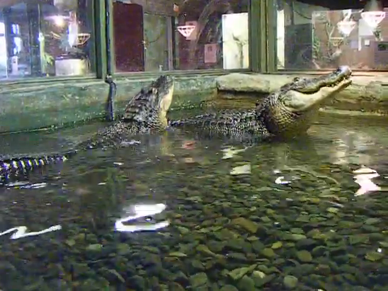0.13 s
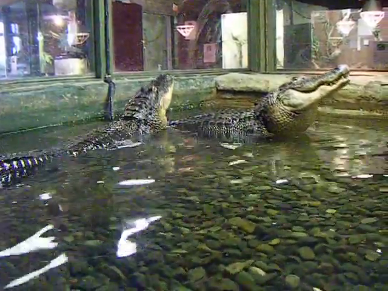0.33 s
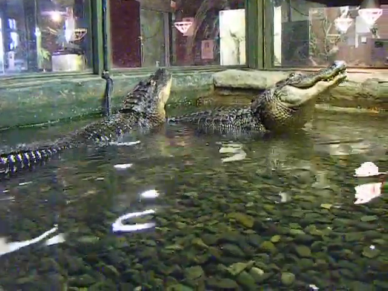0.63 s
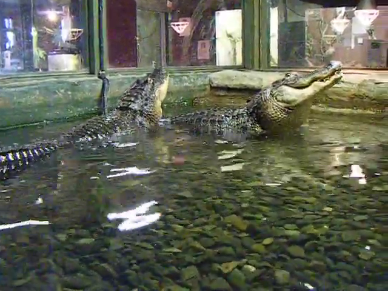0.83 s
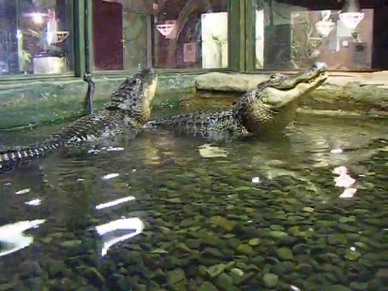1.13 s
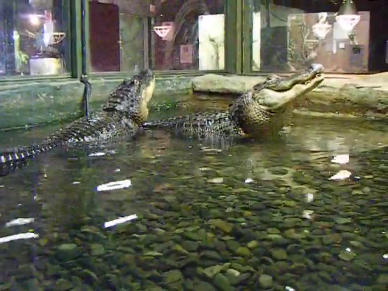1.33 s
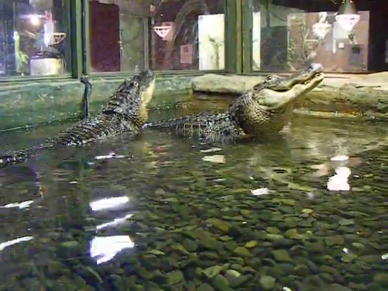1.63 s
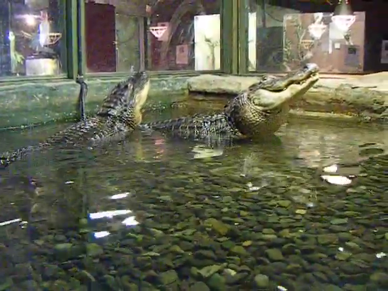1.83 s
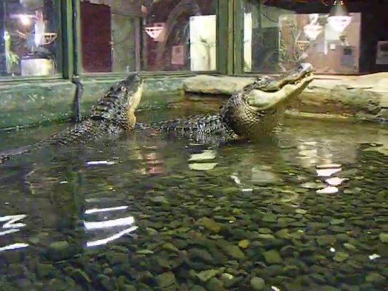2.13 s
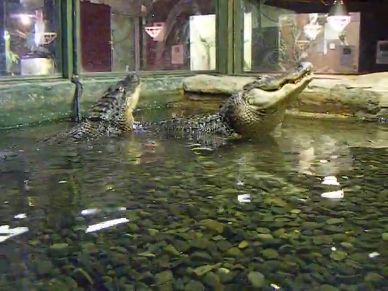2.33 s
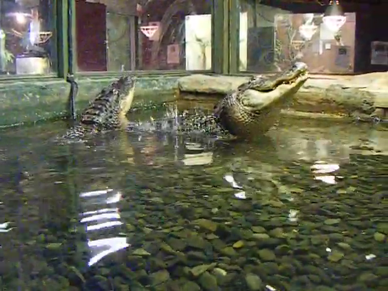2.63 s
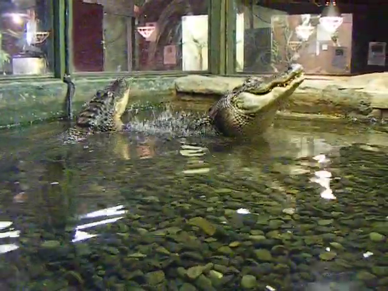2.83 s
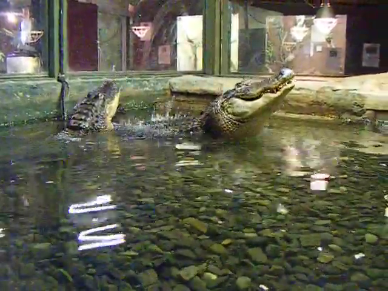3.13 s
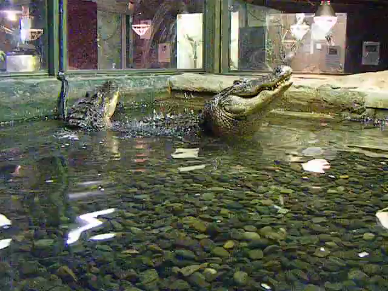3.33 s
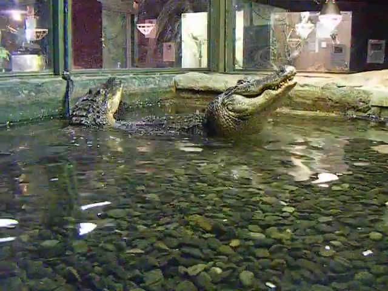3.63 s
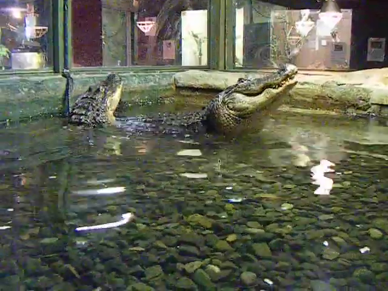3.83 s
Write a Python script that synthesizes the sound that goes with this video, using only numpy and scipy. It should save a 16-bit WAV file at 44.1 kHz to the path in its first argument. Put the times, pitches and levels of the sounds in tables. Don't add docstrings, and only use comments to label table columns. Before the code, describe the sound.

An alligator bellows at the end, low and rough, in an indoor pool. Before it, pump hum and lapping with small plops and snaps, then splashing, fizzing drops and a hollow rattle, heard by a close, dull, clipping microphone.

```python
import sys
import numpy as np
from scipy import signal
from scipy.fft import rfft, irfft
from scipy.io import wavfile
from scipy.ndimage import uniform_filter1d, minimum_filter1d

SR = 44100
rng = np.random.default_rng(int(sys.argv[2]) if len(sys.argv) > 2 else 0)


def dump(signal):
    limited = np.clip(np.atleast_2d(signal).T, -1, 1)
    pcm = np.round(limited * 32767).astype(np.int16)
    wavfile.write(sys.argv[1], SR, pcm)


def to_linear_factor(level_db):
    exponent = np.asarray(level_db, float) / 20
    return 10 ** exponent


N = 176400
T = np.arange(N) / SR

# pitch_hz, level_db (per Hz)
WASH_COLOUR = [(25, -27.5), (85, -11), (140, -17.5), (200, -3.5), (400, 1), (1200, -2), (1900, -8.5),
               (5500, -21.5)]
# pitch_hz, level_db, width_hz
PUMP_LINES = [(198, -64, 1.2), (397.2, -53, 7.7), (623.5, -53.5, 3.8), (1180, -55, 18), (2540, -58, 34),
              (2940, -54, 29)]
# time_s, level_db
LAP_LEVEL = [(0, -37.5), (.4, -37.5), (.8, -40.5), (.95, -38), (1.05, -36), (1.2, -42), (1.3, -36),
             (1.45, -35.5), (1.65, -40), (1.8, -43.5), (1.97, -41), (2.01, -37.5), (2.1, -41), (2.25, -39),
             (2.45, -41.5), (2.68, -38.5)]
# pitch_hz, level_db
LAP_COLOUR = [(300, -2), (600, 7.5), (1300, 6), (1900, -3), (2800, 6.5), (3500, -15), (4600, -16),
              (5600, -14.5)]
# pitch_hz, level_db
SWISH_COLOUR = [(1800, -3.5), (2800, 0), (3500, 1), (4600, 2), (5600, -7)]
# start_s, peak_db, pitch_hz
PLOPS = [(0.413, -21.5, 1324), (0.833, -22, 660), (0.875, -18.5, 687), (.906, -22, 2550),
         (1.014, -25.5, 1290), (1.128, -22.5, 1287), (1.284, -20.5, 1254), (1.408, -18.5, 1305),
         (1.461, -20.5, 1294), (1.502, -22, 730), (1.508, -12, 795), (2.243, -18.5, 990),
         (2.604, -20, 1283), (2.703, -9.5, 725), (2.725, -7, 836), (2.736, -10, 869), (2.759, -16.5, 1176),
         (2.772, -16, 743), (2.835, -8, 770), (2.84, -16.5, 1276), (2.847, -7, 916), (2.857, -11.5, 850),
         (2.865, -11.5, 722), (2.892, -12, 802), (2.909, -13, 802), (2.953, -14.5, 752), (3.269, -10, 760)]
SNAP_TIMES = [
    .8287,
    .9013,
    .9024,
    .9034,
    1.05,
    1.5052,
    1.5092,
    2.9532,
    3.278,
]
# peak_db, bright_ring_hz, low_ring_hz, low_ring_db
SNAPS = [(-1.5, 4900, 1110, -5.5), (-12, 5000, 2450, -0.5), (-10, 4400, 1500, 14.5), (0, 4220, 1620, -7.5),
         (-16, 4200, 2470, -7), (-14, 4200, 520, -0.5), (2.5, 5010, 2090, -9), (0, 4490, 850, -8),
         (-3.5, 4130, 2400, -9)]
# pitch_ratio, level_db
SNAP_RINGS = [(1.023, 1), (0.81, -6), (0.727, -8), (1.177, -8.5), (0.494, -16.5)]
# start_s, peak_db, pitch_hz
BURSTS = [(0.8744, -38, 4100), (1.048, -23, 4800), (1.9837, -27, 4270), (2.6946, -27.5, 2970),
          (2.7246, -20, 2940), (2.7807, -29, 2670), (2.801, -21.5, 2750), (2.8375, -21, 3010),
          (2.8903, -21, 2880), (2.91, -18.5, 4030), (3.0018, -20.5, 2610), (3.0891, -21, 4110),
          (3.1307, -18, 4100), (3.1477, -18.5, 2480), (3.2294, -14.5, 3080), (3.3969, -21, 3082),
          (3.4315, -17.5, 5340), (3.5354, -19, 3610), (3.6813, -25, 3610), (3.765, -24, 4900),
          (3.786, -20.5, 4940), (3.8906, -20.5, 3610)]
# time_s, level_db
SPRAY_LEVEL = [
    (2.7, -56),
    (2.73, -43),
    (2.78, -36.5),
    (2.83, -28),
    (3.0, -34),
    (3.5, -30),
    (3.6, -33.5),
    (3.68, -43.5),
    (4.0, -34),
]
# pitch_hz, level_db
SPRAY_COLOUR = [(900, 1.5), (1500, 0.5), (1800, -3), (3000, -2), (4700, -3.5), (5600, -6.5)]
# time_s, level_db
SHAKE = [
    (2.82, -32),
    (2.9, -38.5),
    (3.1, -30),
    (3.45, -29),
    (3.585, -22.5),
    (3.61, -18.5),
    (3.76, -27.5),
    (3.88, -21.5),
    (3.97, -26),
]
# pitch_hz, level_db, ring_time_s (to fall 60 dB)
FITTING_RINGS = [(192.6, -13.5, 0.2), (681, 3, 0.21), (756, 4, 0.29), (794.2, 4, 0.2), (1347, -25.5, 0.2),
                 (1525, -11.5, 0.07), (2140, -26.5, 0.2), (2670, -29, 0.15), (3066, -9.5, 0.078),
                 (3610, -12, 0.11), (4050, -8.5, 0.1), (4820, -18, 0.15), (5270, -19, .15)]
# start_s, peak_db, pitch_hz
KNOCKS = [(2.939, -20, 756), (2.987, -16, 798), (3.004, -19, 757), (3.034, -19.5, 788), (3.052, -29.5, 793),
          (3.084, -19, 800), (3.104, -30, 670), (3.137, -19, 771), (3.174, -18, 788), (3.227, -15, 777),
          (3.25, -16, 770), (3.305, -19, 738), (3.323, -21, 735), (3.343, -15.5, 783), (3.377, -16.5, 770),
          (3.404, -20, 823), (3.438, -18.5, 756), (3.486, -26, 803), (3.522, -14.5, 695),
          (3.555, -9.5, 763), (3.571, -13.5, 755), (3.605, -6, 772), (3.623, -10, 764), (3.645, -6.5, 746),
          (3.683, -7.5, 702), (3.691, -9.5, 781), (3.707, -10, 741), (3.729, -15, 779), (3.755, -5.5, 711),
          (3.78, -5.5, 744), (3.802, -18, 660), (3.84, -12, 701), (3.852, -6.5, 756), (3.892, -12, 670),
          (3.914, -14.5, 668), (3.935, -12, 700)]
# time_s, rate_hz, level_db
SHIVER = [
    (2.452, 13, -86),
    (2.597, 15.6, -63.5),
    (2.799, 18.6, -61),
    (2.998, 20.4, -55.5),
    (3.247, 22.6, -60.5),
    (3.498, 23.6, -62),
    (3.678, 23, -67.5),
]
# multiple_of_rate, level_db
SHIVER_OVERTONES = [(2, -9.5), (3, -2), (4, 4), (5, -16.5), (6, -3.5), (7, -5), (8, -13.5), (9, -5),
                    (10, -3.5), (11, -4.5)]
# time_s, pitch_hz, effort_db, roughness (0 to 1)
BELLOW = [
    (3.585, 41.1, -33, 0.43),
    (3.612, 41.58, -35.5, 0.12),
    (3.701, 43.12, -29, 0.16),
    (3.757, 41.51, -23, 0.47),
    (3.826, 42.61, -23.5, 0.27),
    (3.884, 45.38, -21.5, .15),
    (4.0, 46.46, -22, 0.22),
]
# pitch_hz, width_hz, level_db
THROAT = [(237, 85, -3), (302.5, 42, -0.5), (358, 50, 1.5), (491, 43, -9), (661.6, 35, 4)]
# pitch_hz, width_hz, level_db
NOSE = [(2626, 50, -25.5), (2916, 50, -23), (3630, 72, -24.5), (4160, 94, -23.5), (4750, 45, -18),
        (4865, 74, -21), (5310, 180, -20.5)]


def evened(x):
    return x / np.sqrt(np.mean(x ** 2) + 1e-20)


def read(points, hz):
    f, value = np.transpose(points)
    return np.interp(np.log(hz + 1), np.log(f + 1), value)


def level(table, fade_s, axis=1):
    rows = np.array(table)
    db = np.interp(T, rows[:, 0], rows[:, axis])
    outside_s = np.maximum(np.maximum(rows[0, 0] - T, T - rows[-1, 0]), 0)
    return to_linear_factor(db - 60 * outside_s / fade_s)


def add(mix, s, sound):
    part = mix[round(s * SR):][:len(sound)]
    part += sound[:len(part)]


def resonate(x, hz, width):
    r = np.exp(-np.pi * width / SR)
    return 2 * signal.lfilter([1 - r], [1, -r * np.exp(2j * np.pi * hz / SR)], x).real


def highpass(x, hz, order=2):
    return signal.sosfilt(signal.butter(order, hz, "high", fs=SR, output="sos"), x)


def slow(size):
    return evened(uniform_filter1d(uniform_filter1d(rng.standard_normal(N), size), size))


def shiver_turns():
    rows = np.array(SHIVER)
    return np.cumsum(np.interp(T, rows[:, 0], rows[:, 1])) / SR


def grains(per_s, colour, cycles, spread_db, count=20, size=N):
    clumps = to_linear_factor(2 * slow(1100))[:size]
    happens = rng.random(size) < per_s / SR
    strength = to_linear_factor(spread_db * np.minimum(rng.exponential(1, size), 4)) * happens
    kind = rng.integers(0, count, size)
    pitches = np.geomspace(colour[0][0], colour[-1][0], count) * rng.uniform(0.89, 1.03, count)
    out = np.zeros(N)
    for k, hz in enumerate(pitches):
        u = np.arange(1200) * hz / SR / cycles
        ring = np.sin(2 * np.pi * cycles * u * (1 + 0.0287 * u))
        grain = (1 - np.exp(-3 * u)) * np.exp(-u) * ring
        train = strength * np.roll(clumps, k // 3 * 9001) * (kind == k)
        out[N - size:] += signal.oaconvolve(train, grain * hz * to_linear_factor(read(colour, hz)))[:size]
    return out / np.sqrt(np.mean(out[N - size:] ** 2))


def wash():
    a, b, patches = rng.standard_normal((N // 128 + 5, 257, 3)).T
    patches = evened(uniform_filter1d(uniform_filter1d(patches, 6, 0), 14, 1))
    white = signal.istft((a + 1j * b) * to_linear_factor(2.2 * patches), nperseg=512, noverlap=384)[1][:N]
    noise = evened(irfft(rfft(white) * to_linear_factor(read(WASH_COLOUR, np.fft.rfftfreq(N, 1 / SR))), N))
    w = rng.standard_normal(N)
    hum = sum(to_linear_factor(db) * evened(resonate(w, hz, width)) for hz, db, width in PUMP_LINES)
    return to_linear_factor(-43.5) * noise + hum


def lapping():
    waves = to_linear_factor(1.8 * slow(900) + 1.6 * slow(250))
    swish = to_linear_factor(-5) * waves * grains(9000, SWISH_COLOUR, 5.6, 0.8, count=24)
    bubbles = to_linear_factor(-3.5 + 2.3 * slow(500)) * grains(1200, LAP_COLOUR, 9, 1.7)
    return level(LAP_LEVEL, 6.8) * (bubbles + swish)


def plops():
    t60_s, glide_per_s = 0.061, 3.4
    out, t = np.zeros(N), T[:4000]
    for (s, db, hz), (up, down) in zip(PLOPS, rng.random((len(PLOPS), 2))):
        phase = 2 * np.pi * hz * t * (1 + glide_per_s * t / 2)
        higher = 0.69 * np.sin((1.16 + 0.21 * up) * phase)
        lower = 0.48 * np.sin((0.646 + 0.29 * down) * phase)
        ring = np.sin(phase) + (higher + lower) * to_linear_factor(-60 * t / 0.054)
        add(out, s, to_linear_factor(db - 6 - 60 * t / t60_s) * (1 - np.exp(-t / 0.00051)) * ring)
    return highpass(out, 350)


def snaps():
    top_t60_s, low_t60_s = 0.0052, 0.0055
    out, t = np.zeros(N), T[:1500]
    for s, (db, top_hz, low_hz, low_db) in zip(SNAP_TIMES, SNAPS):
        top = sum(to_linear_factor(ring_db) * np.sin(2 * np.pi * ratio * top_hz * t) for ratio, ring_db in SNAP_RINGS)
        top = top * to_linear_factor(-60 * t / top_t60_s)
        low = np.sin(2 * np.pi * low_hz * t) * to_linear_factor(low_db - 60 * t / low_t60_s)
        add(out, s, to_linear_factor(db) * (top + low) * (1 - np.exp(-t / 0.0002)))
    return highpass(out, 400)


def bursts():
    t60_s, width_hz = 0.12, 160
    out, t = np.zeros(N), T[:5000]
    for (s, db, hz), w in zip(BURSTS, rng.standard_normal((len(BURSTS), 5000))):
        fizz = evened(resonate(w, hz, width_hz)) + to_linear_factor(-3) * evened(resonate(w, 3400, 3000))
        add(out, s, to_linear_factor(db - 10.5 - 60 * t / t60_s) * (1 - np.exp(-t / 0.0015)) * fizz)
    return highpass(out, 900, order=3)


def spray():
    throb = 1 + 0.29 * np.cos(2 * np.pi * (shiver_turns() - .2))
    drops = grains(6700, SPRAY_COLOUR, 10, 1.3, count=30, size=N * 3 // 8)
    return level(SPRAY_LEVEL, 0.079) * throb * to_linear_factor(2.0 * slow(120)) * drops


def fitting():
    gate_s, steady_shake = 0.0065, .4
    train = np.zeros(N)
    for s, db, hz in KNOCKS:
        add(train, s, np.exp(-T[:3000] / gate_s))
    dull = to_linear_factor(-17 * np.clip((T - 3.55) / 0.014, 0, 1))
    sag = to_linear_factor(-60 * np.maximum(T - 3.71, 0))
    out = np.zeros(N)
    for hz, db, t60 in FITTING_RINGS:
        width = 3.1 / t60
        drive = (steady_shake + train * (hz > 300)) * to_linear_factor(2.0 * slow(1500)) * rng.standard_normal(N)
        ring = resonate(resonate(drive, hz, width), hz, 6 * width)
        ring = ring / np.std(ring[-N // 4:]) * to_linear_factor(db - 9 * (600 < hz < 900))
        if hz > 1600:
            ring = ring * dull
        elif 780 < hz < 900:
            ring = ring * sag
        elif hz < 300:
            ring = ring * np.sqrt(sag)
        out += ring
    return level(SHAKE, 0.38) * out * to_linear_factor(-0.5)


def knocks():
    t60_s, rise_s = 0.079, 0.0018
    out, t = np.zeros(N), T[:4000]
    for (s, db, hz), lag in zip(KNOCKS, rng.random((len(KNOCKS), 3)) * 2 * np.pi):
        sides = np.sin(2 * np.pi * .93 * hz * t + lag[0]) + np.sin(2 * np.pi * 1.06 * hz * t + lag[1])
        overtone = np.sin(2 * np.pi * 1535 * t + lag[2])
        ring = np.sin(2 * np.pi * hz * t) + to_linear_factor(-11.5) * sides + to_linear_factor(-21) * overtone
        add(out, s, to_linear_factor(db - 1.5 - 60 * t / t60_s) * (1 - np.exp(-t / rise_s)) * ring)
    return out


def thud():
    s, hz, width_s = 3.83, 82, .04
    return to_linear_factor(-46) * np.exp(-((T - s) / width_s) ** 2) * np.sin(2 * np.pi * hz * T)


def shiver():
    turns = shiver_turns()
    tone = sum(to_linear_factor(db) * np.cos(2 * np.pi * k * turns + 0.97 * k * k) for k, db in SHIVER_OVERTONES)
    return np.sqrt(2) * level(SHIVER, .15, axis=2) * tone


def bellow():
    rows = np.array(BELLOW)
    rough = np.clip(np.interp(T, rows[:, 0], rows[:, 3]), 0, 1)
    pitch = np.interp(T, rows[:, 0], rows[:, 1])
    turns = np.cumsum(pitch * (1 + .06 * rough * slow(600))) / SR
    lags = rng.standard_normal(18)
    folds = sum(np.cos(2 * np.pi * k * turns + 0.9 * lag) for k, lag in enumerate(lags, 3))
    puffs = (.5 + np.exp(-(turns % 1) / 0.58)) * rng.standard_normal(N)
    breath = signal.lfilter(*signal.butter(2, (150, 1000), "band", fs=SR), puffs)
    drive = (1 - rough) * evened(folds) + rough * evened(breath)
    throat = np.zeros(N)
    for k, (hz, width, db) in enumerate(THROAT):
        wide = 1.22 * width
        throat += (-1) ** k * to_linear_factor(db) * resonate(resonate(drive, hz, wide), hz, wide)
    rasp = sum(to_linear_factor(db) * evened(resonate(resonate(puffs, hz, w), hz, 3 * w)) for hz, w, db in NOSE)
    return level(BELLOW, .04, axis=2) * (evened(throat) + rasp) * to_linear_factor(0.5)


def room(x):
    t60_s = .3
    taps = np.zeros(SR // 2)
    at = np.arange(200, len(taps) - 20, 20)
    taps[at + rng.integers(0, 20, len(at))] = rng.choice([-1., 1.], len(at))
    taps *= to_linear_factor(-60 * T[:len(taps)] / t60_s)
    return x + to_linear_factor(-9) * signal.oaconvolve(x, taps / np.linalg.norm(taps))[:N]


def scene():
    wet = room(bellow() + plops() + spray() + lapping() + bursts())
    return (wet + fitting() + knocks() + shiver() + thud() + snaps() + wash())[None]


def top_cut(x):
    return signal.sosfilt(signal.butter(12, 16500, fs=SR, output="sos"), x)


def record(dry):
    duck_from_db, duck_depth_db, hold_s = -13.5, -8, .03
    edge_hz, clip, offset = 5800, .72, -.0028
    sensed = highpass(dry[0], 1000, order=4)
    power_db = 10 * np.log10(abs(uniform_filter1d(sensed ** 2, 220, origin=109)) + 1e-12)
    over = np.clip(power_db - duck_from_db, 0, 1)
    hold = round(hold_s * SR / 2)
    held = np.roll(-minimum_filter1d(-over, size=2 * hold + 1), hold + 120)
    ducked = dry * to_linear_factor(duck_depth_db * uniform_filter1d(held, size=250))
    treble_cut = signal.firwin(201, edge_hz, window=("kaiser", 9), fs=SR)[None]
    cut = signal.oaconvolve(ducked, treble_cut, "same")
    return top_cut(np.clip(cut + offset, -clip, clip))


dry = scene()
out = record(dry)
dump(out)
```